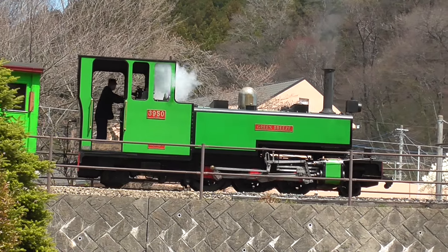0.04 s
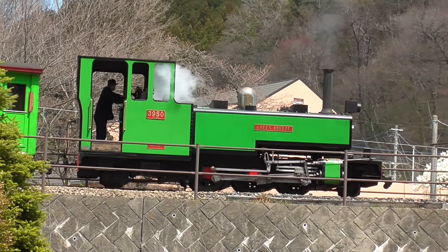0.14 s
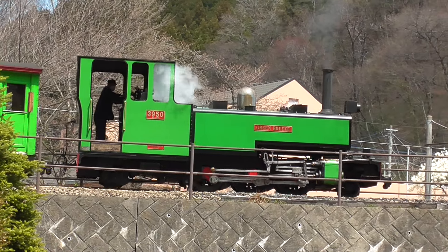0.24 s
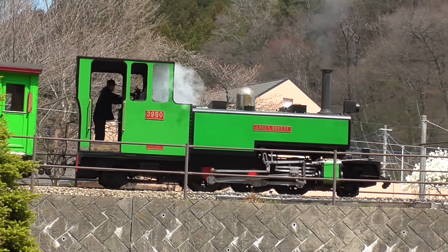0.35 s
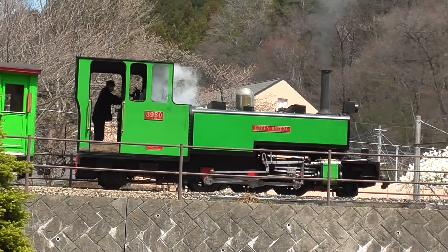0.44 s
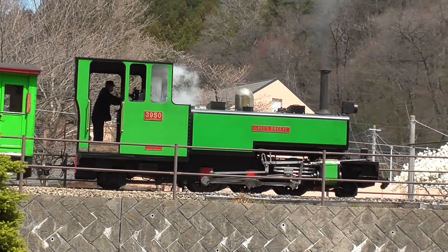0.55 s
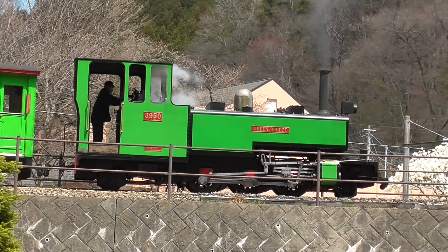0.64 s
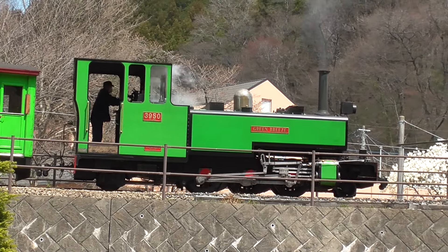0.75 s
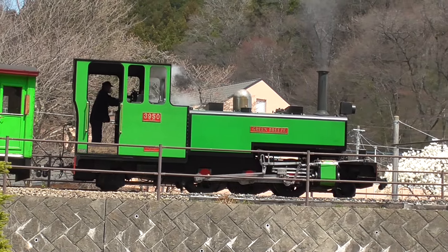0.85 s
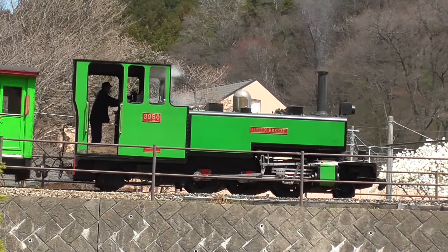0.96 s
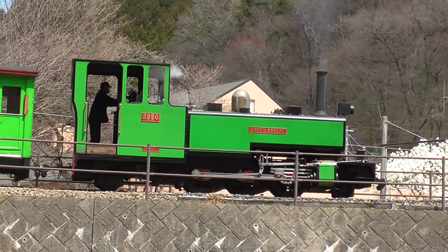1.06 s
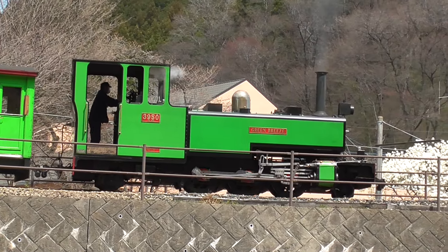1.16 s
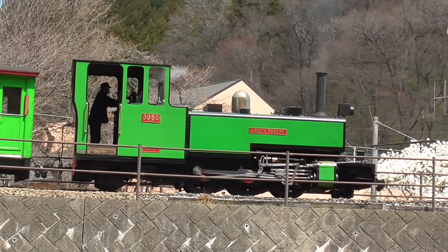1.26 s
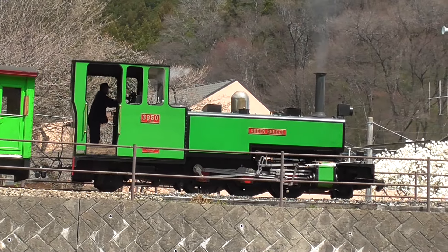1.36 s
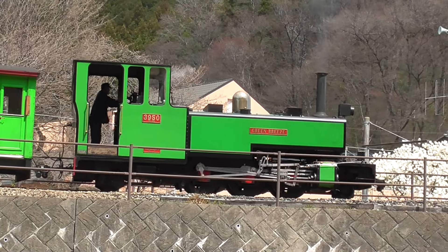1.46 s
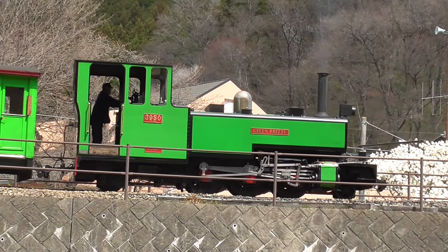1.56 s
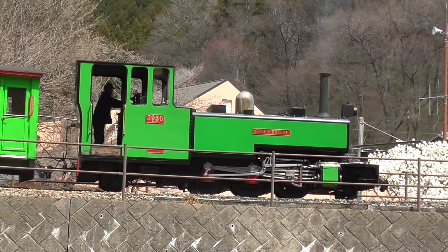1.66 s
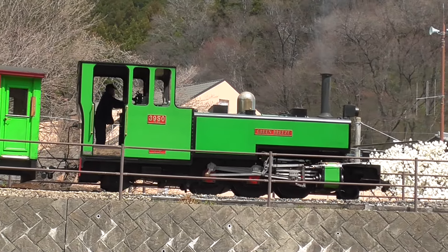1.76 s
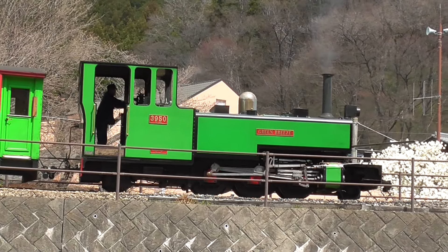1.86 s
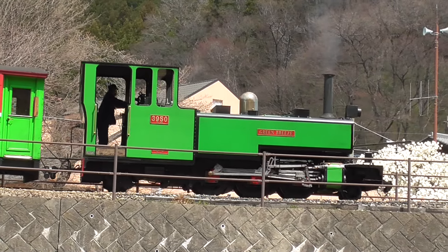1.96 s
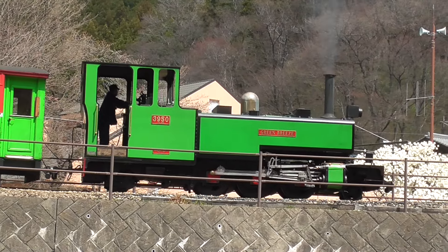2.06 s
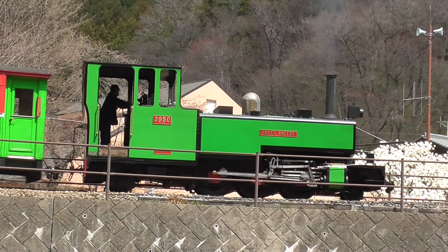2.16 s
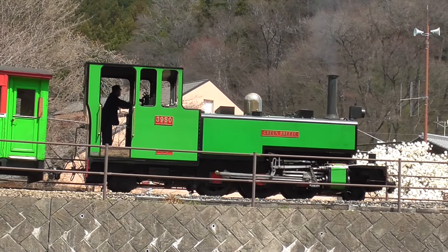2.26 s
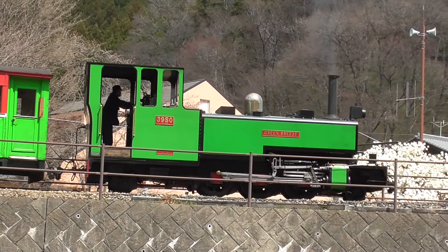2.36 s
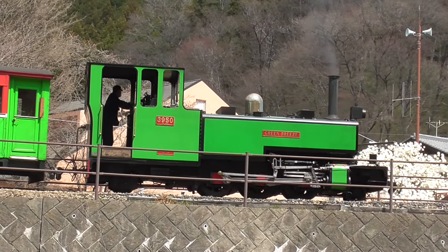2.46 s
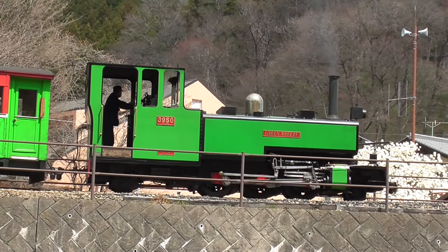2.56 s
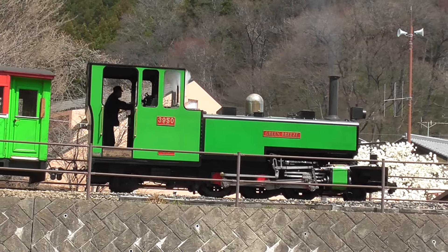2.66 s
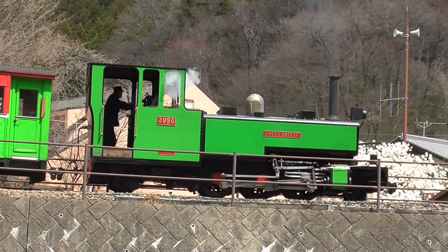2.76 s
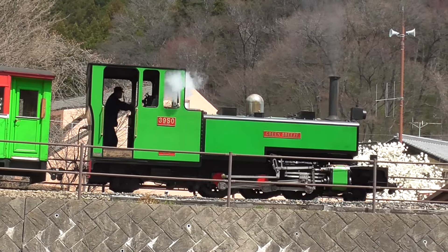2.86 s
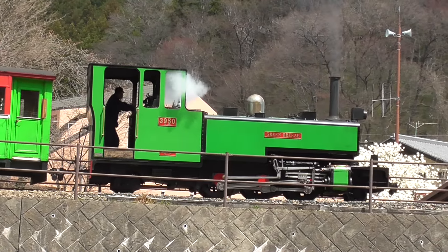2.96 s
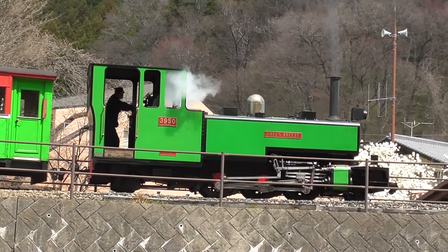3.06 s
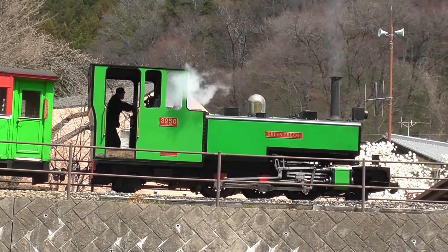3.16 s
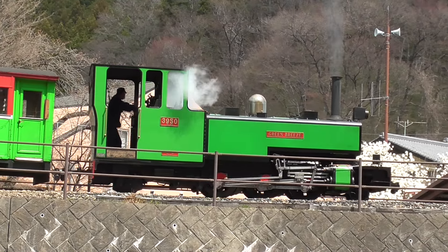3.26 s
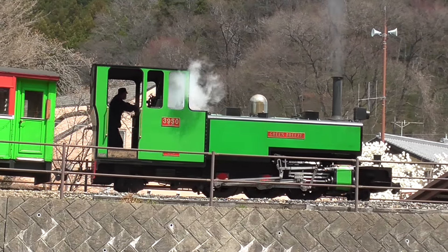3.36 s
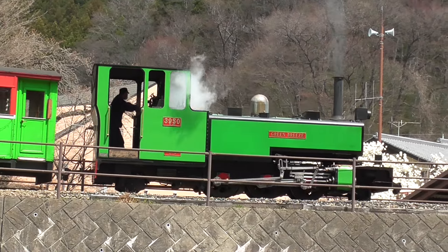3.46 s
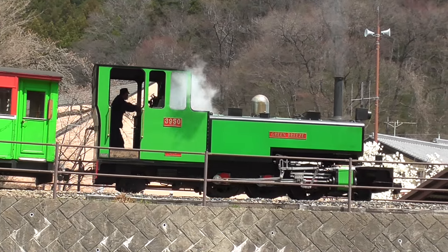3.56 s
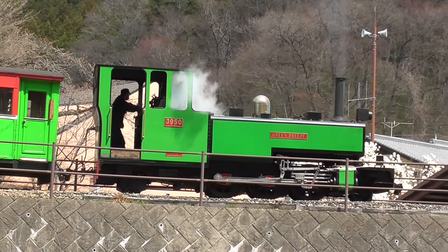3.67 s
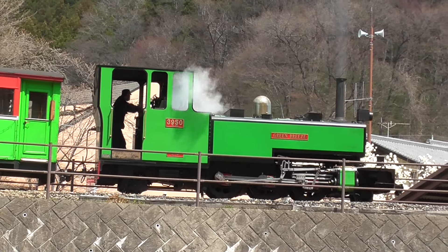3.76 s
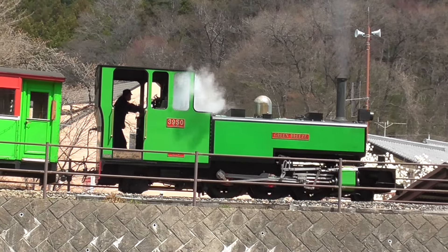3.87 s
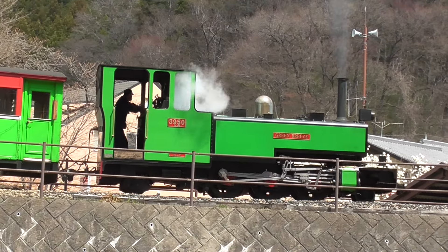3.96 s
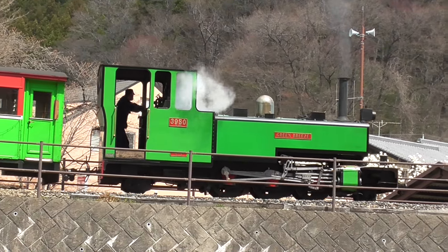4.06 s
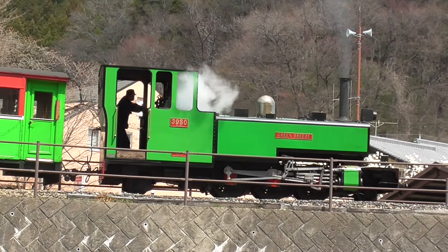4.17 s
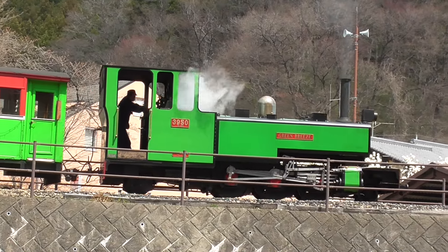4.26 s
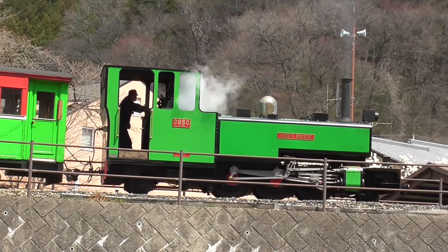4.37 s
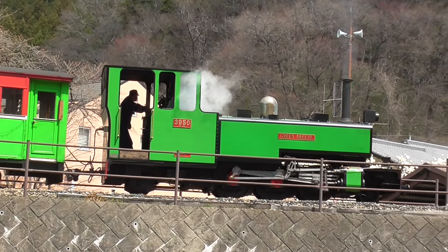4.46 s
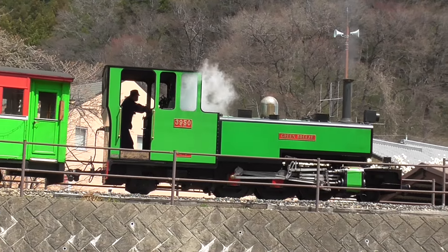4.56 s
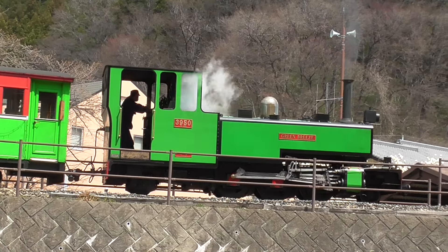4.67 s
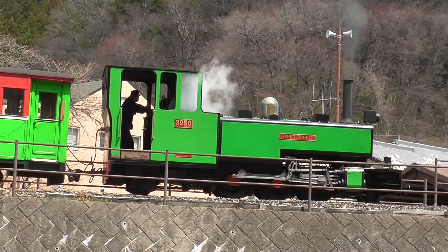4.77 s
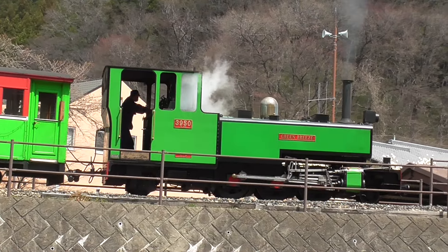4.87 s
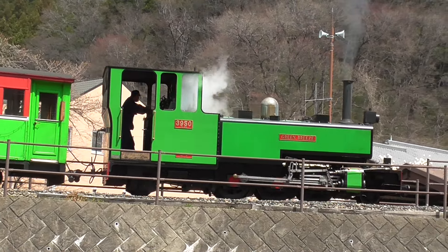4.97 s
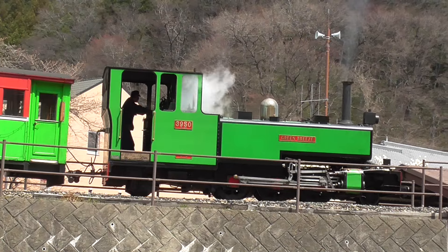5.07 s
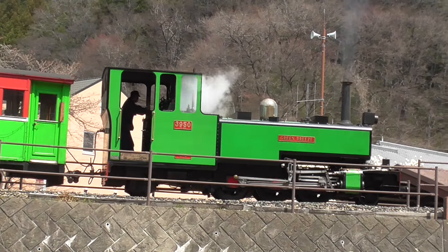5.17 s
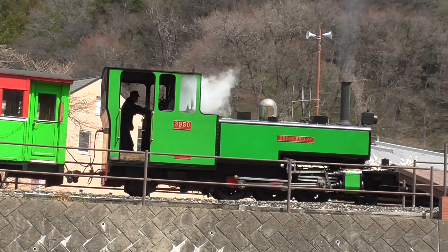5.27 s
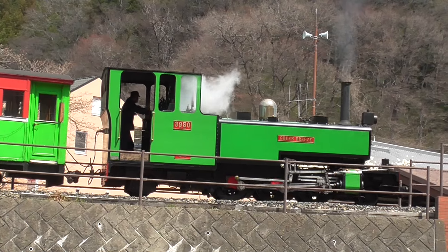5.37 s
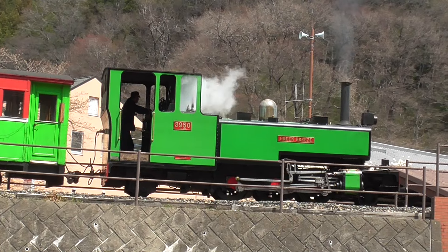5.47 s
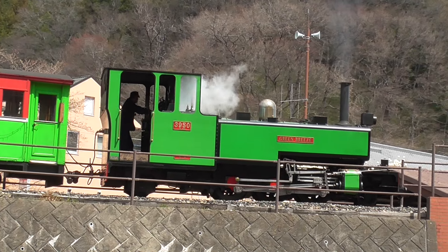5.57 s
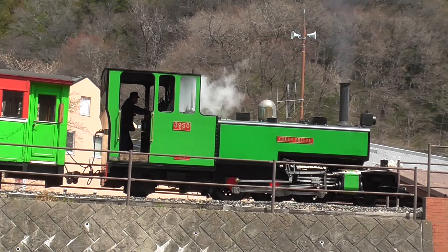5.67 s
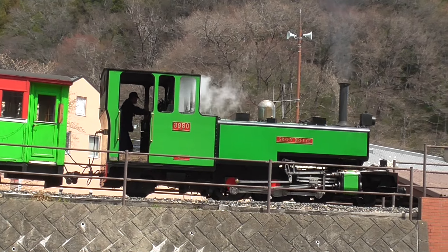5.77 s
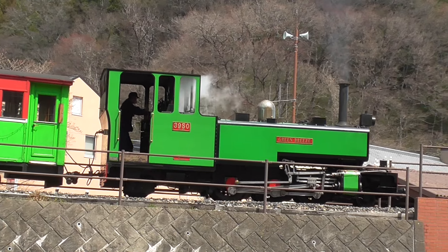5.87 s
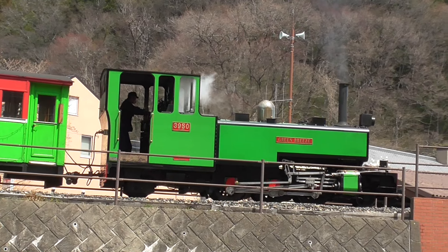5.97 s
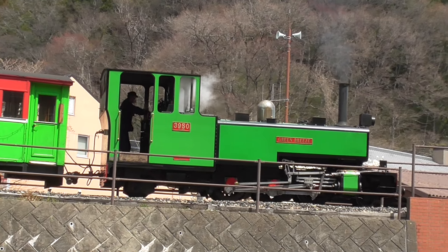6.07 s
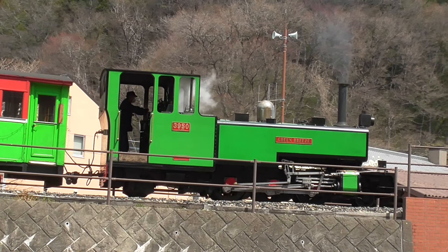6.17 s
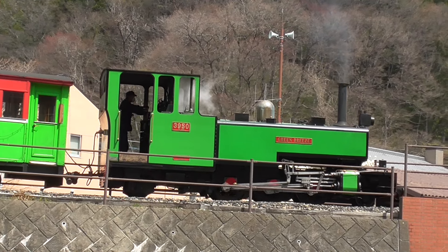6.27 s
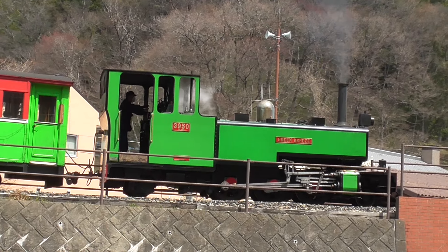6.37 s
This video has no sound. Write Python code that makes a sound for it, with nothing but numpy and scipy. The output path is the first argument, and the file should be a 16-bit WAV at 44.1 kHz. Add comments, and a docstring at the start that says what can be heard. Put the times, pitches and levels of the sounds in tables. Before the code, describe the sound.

A small steam locomotive sounds its single-note whistle outdoors. A short, wet, breathy toot comes first, already under way, and its echo fades off wooded hillsides. In the pause, quiet engine rumble, leaking steam and a few knocks emerge. A spurt of steam leads into a nearly three-second whistle blast, smooth and steady, which stops abruptly and leaves a blurred valley echo over the faint engine. The whistle dominates the stereo microphone, which ducks the background.

```python
"""A single-note whistle blows short, then long, its pitch climbing, and a wooded valley answers; a small engine rolls below.
The note is a near-pure tone that climbs as hot steam fills the bell; the steam jet is coloured noise that also stirs
the bell's other resonances. Hillsides return the note late and blurred, and trees scatter the roar.
An automatic gain ducks under the whistle; as it recovers between the blasts, one hears the engine's
filtered-noise rumble, leaking steam and knocks, and the brief wavering tones of its frames and wheels."""
import sys
import numpy as np
from scipy import signal
from scipy.fft import rfft, irfft, next_fast_len
from scipy.io import wavfile
from scipy.ndimage import uniform_filter1d

SR = 44100
rng = np.random.default_rng(int(sys.argv[2]) if len(sys.argv) > 2 else 0)


def log_audio(samples):
    """Write samples as a 16-bit WAV file to the path given in sys.argv[1]."""
    # one column per channel
    frames = np.atleast_2d(samples).T
    # limit to full scale, then quantise
    limited = np.clip(frames, -1, 1)
    pcm = np.round(limited * 32767).astype(np.int16)
    wavfile.write(sys.argv[1], SR, pcm)


N = 283322
T = np.arange(N) / SR

# The blasts. Each row: valve opens in seconds, closes in seconds, starting pitch in Hz,
# warm-up time constant in seconds, strength in dB.
BLASTS = [(-0.05, 0.348, 521.2, 0.47, 10), (2.755, 5.616, 539.8, 1.2, 14.5)]
# Wet steam chokes the note. Each row: centre in seconds, half width in seconds, share lost from 0 to 1.
CHOKES = [(0.107, 0.023, 0.6), (0.192, 0.024, 0.67), (2.88, 0.021, 0.85)]
# The voice of the short blast, before trims and the blast's strength.
# Each row: time in seconds, octave in dB, breathy roar in dB, hiss in dB.
VOICE_SHORT = [(0.01, -34, -30, -36), (0.046, -31.5, -32, -46.5), (0.096, -36.5, -29, -41.5),
               (0.164, -26.5, -27.5, -43), (0.21, -44, -27, -42), (0.23, -25, -25.5, -42.5),
               (0.25, -36, -32.5, -43.5), (0.33, -35.5, -37.5, -46)]
# The voice of the long blast, likewise.
# Each row: time in seconds, octave in dB, breathy roar in dB, hiss in dB.
VOICE_LONG = [(2.78, -35, -29.5, -41.5), (3.08, -31.5, -34.5, -48), (3.12, -36.5, -32, -44),
              (3.64, -27.5, -38, -44.5), (3.88, -36, -42.5, -52.5), (4.25, -36, -37, -51),
              (4.33, -39, -39.5, -54), (4.71, -28, -37.5, -46), (5.27, -34.5, -40, -52),
              (5.6, -32.5, -35.5, -44)]
# The long note sways between the ears. Each row: time in seconds, left over right in dB.
SWAY = [(2.8, 2), (3.1, 2.5), (3.86, 1), (4.51, 2.5), (5.06, 1.5), (5.6, 0.5)]
# Resonances of the bell stirred by the jet.
# Each row: multiple of the pitch, width in Hz before a lower limit, relative level in dB.
BELL_MODES = [(0.86, 34.3, -2), (0.998, 29.94, 3), (1.135, 30.3, 2), (1.31, 49.3, -3), (1.68, 54.9, -9),
              (1.84, 22.15, -4), (2.0, 36.26, -7.5), (2.168, 44.8, -8), (2.65, 110.3, -12.5),
              (2.98, 139.2, -18.5), (3.72, 126, -11), (4.45, 34.56, -19.5), (5.75, 69.5, -22.5),
              (6.63, 59.7, -22.5)]
# Colour of the steam jet. Each row: frequency in Hz, relative density in dB per Hz.
JET_COLOUR = [(30, -35.5), (90, -6.5), (200, 0.5), (320, -3.5), (450, 11), (750, 12), (1400, 2), (2300, -1),
              (2800, -6), (4200, -4.5), (6100, -12), (8500, -0.5), (10000, -3.5), (12500, -14),
              (15000, -21)]
# Left-right likeness of the jet. Each row: frequency in Hz, likeness from -1 to 1.
JET_LIKENESS = [(100, 0.5), (300, 0.57), (650, 0.95), (1200, 0.9), (2000, 0.57), (4000, 0.46), (8500, 0.53),
                (13000, 0.53)]
# Steam spurts as the valve cracks open.
# Each row: peak in seconds, rise in seconds, fall in seconds, level in dB.
SPURTS = [(2.559, 0.0097, 0.066, -41), (2.753, 0.027, 0.022, -22)]
# Near and far hillsides that return the note. Each row: delay in seconds, level in dB.
HILLS = [(0.153, -9), (0.337, -16), (0.471, -28.5), (0.722, -36), (0.95, -33.5), (1.35, -36.5),
         (1.918, -42)]
# Faces of the wooded slope that return the roar. Each row: delay in seconds, level in dB.
SLOPES = [(0.165, -8.5), (0.32, -11)]
# Colour of the engine's rumble. Each row: frequency in Hz, relative density in dB per Hz.
RUMBLE_COLOUR = [(15, -57.5), (25, -18.5), (156, -7.5), (189, -4.5), (229, -7), (486, -6.5), (525, 1.5),
                 (578, -10), (728, -10.5), (802, -7), (1110, -20), (1320, -17.5), (2500, -47),
                 (3250, -70.5), (5500, -120)]
# Colour of its leaking steam. Each row: frequency in Hz, relative density in dB per Hz.
LEAK_COLOUR = [(1180, -32.5), (2000, -2.5), (2270, -2), (2470, 0), (2660, -5), (3860, -2), (4340, -5.5),
               (6140, -12), (7450, -3), (8820, -1), (12700, -11), (15000, -21.5)]
# Steam leaks harder just before the long blast. Each row: time in seconds, level in dB.
LEAK_LEVEL = [(0.9, -57), (1.9, -57), (2.4, -53), (2.8, -55), (6.4, -54)]
# The frames and wheels sing briefly.
# Each row: centre in seconds, half width in seconds, frequency in Hz, level in dB.
GROANS = [(0.87, 0.035, 195, -32), (1.0, 0.09, 194, -40), (1.47, 0.08, 195, -42), (1.25, 0.06, 256, -44),
          (1.55, 0.2, 263, -41), (1.83, 0.05, 795, -42), (2.1, 0.06, 790, -43), (2.21, 0.09, 194, -41),
          (6.29, 0.015, 810, -33), (6.32, 0.08, 196, -38), (6.3, 0.16, 340, -43)]
# Knocks of the running gear. Each row: peak in seconds, level in dB, rise in seconds, 60 dB decay in seconds.
KNOCKS = [(0.945, -37, 0.003, 0.08), (1.591, -37, 0.002, 0.07), (1.648, -33, 0.002, 0.08),
          (2.3, -44, 0.02, 0.3), (2.352, -37, 0.015, 0.3), (6.04, -27, 0.003, 0.08),
          (6.053, -29, 0.006, 0.16)]
# Colour of the knocks. Each row: frequency in Hz, relative density in dB per Hz.
KNOCK_COLOUR = [(150, -10), (550, 3), (1000, 3), (1300, -2), (1800, -14), (2300, -14), (3500, -29),
                (6000, -35), (12000, -48)]
# Left-right likeness of the engine. Each row: frequency in Hz, likeness from -1 to 1.
ENGINE_LIKENESS = [(50, -0.65), (80, -0.57), (140, 0.25), (300, 0.51), (900, 0.62), (3000, 0.78),
                   (10000, 0.39)]

# pitch of the fully heated bell, its sag in a full choke, its wander in the steady blast
HOT_HZ, CHOKE_SAG_HZ, WANDER_HZ = 559.5, 11, 0.4
# level of the note before the blast's strength is added
NOTE_DB = -10.5
# thin sizzle at the valve seat, from the moment the lever takes up
SIZZLE_START_S, SIZZLE_FADE_DB_PER_S, SIZZLE_DB, SIZZLE_HZ = 2.55, 8, -43.5, 9300
RUMBLE_DB = -37.5
CUTOFF_HZ = 15300


def whistle_note(phase, unrest, octave_db, flutter_db=0.5, swell_db=0.45, octave_flutter_db=1.34,
                 octave_trim_db=1.0, third_db=-24.5, right_lead_rad=0.28):
    """The bell's standing wave: almost a sine, with a weak octave and a trace of the twelfth."""
    phase = phase + np.array([[0], [1]]) * right_lead_rad
    first_db = NOTE_DB + flutter_db * unrest * drift(31) + swell_db * drift(8.9)
    first = from_db(first_db) * clear_share() * np.sin(phase)
    second = from_db(octave_db + octave_trim_db + octave_flutter_db * drift(35)) * np.sin(2 * phase)
    third = from_db(octave_db + third_db + 2 * drift(12)) * np.sin(3 * phase)
    # a rough jet weakens the twelfth
    third = third / np.maximum(unrest, 0.5) ** 2
    return np.sqrt(2) * (first + second + third) * valve(edge_s=0.004)


def standing_wave(pitch, unrest, jitter=0.0022):
    """Phase of the note, in radians, shaken more when the jet is rough."""
    shaken_hz = pitch * (1 + jitter * unrest * drift(40))
    return 2 * np.pi * np.cumsum(shaken_hz) / SR


def bell_pitch(unrest):
    """The note climbs towards its hot pitch in every blast, sags when choked and wanders with the jet."""
    climbs = []
    for opens, _, start_hz, warm_s, _ in BLASTS:
        coldness = np.exp(-np.maximum(T - opens, 0) / warm_s)
        climbs.append(HOT_HZ + (start_hz - HOT_HZ) * coldness)
    sag = CHOKE_SAG_HZ * (1 - clear_share())
    return per_blast(*climbs) - sag + WANDER_HZ * unrest * drift(3.81)


def clear_share():
    """Share of the note that survives the slugs of wet steam."""
    return np.prod([1 - min(lost, 1) * np.exp(-((T - s) / width) ** 2) for s, width, lost in CHOKES], axis=0)


def valve(edge_s):
    """1 while steam flows, 0 otherwise, with soft edges."""
    flow = 0
    for opens, closes, *_ in BLASTS:
        flow = flow + 0.5 * (np.tanh((T - opens) / edge_s) - np.tanh((T - closes) / edge_s))
    return flow


def per_blast(short, long):
    """The first blast's controls until midway through the pause, then the second's."""
    midway = (BLASTS[0][1] + BLASTS[1][0]) / 2
    return np.where(T < midway, short, long)


def strength():
    """Gain of the blast whose controls are in force."""
    return from_db(per_blast(*(db for *_, db in BLASTS)))


def bell_roar(pitch, roar_db, unrest, level_db=-2.5, side_db=-17, dulling=0.65):
    """Turbulence rings in resonances that climb with the note; a rough jet stirs mostly the low ones."""
    phase = 2 * np.pi * np.cumsum(pitch) / SR
    upper_gain = unrest ** -dulling
    modes = []
    for multiple, width_hz, db in BELL_MODES:
        gain = from_db(db)
        if multiple > 2.4:
            gain = gain * upper_gain
        # high resonances radiate freely, so none is sharp
        modes.append((multiple, max(width_hz, 15 * multiple), gain))
    mid, side = (sum(gain * narrow_noise(multiple * phase, width_hz) for multiple, width_hz, gain in modes)
                 for _ in range(2))
    ring = mid + from_db(side_db) * side * [[1], [-1]]
    return from_db(roar_db + level_db) * valve(edge_s=0.005) * ring


def steam_jet(pitch, hiss_db, level_db=7.0, flicker_db=0.6):
    """Broad hiss from the slot, as the full flow and as brief spurts, with a thin sizzle at the valve seat."""
    flow = strength() * from_db(hiss_db + level_db) * valve(edge_s=0.014)
    spurts = sum(from_db(db) * np.exp(-np.maximum((s - T) / rise, (T - s) / fall))
                 for s, rise, fall, db in SPURTS)
    noise = stereo_noise(JET_COLOUR, JET_LIKENESS)
    # part of the hiss runs up the bell and comes back one period later
    noise = noise + 0.17 * np.array([delayed(channel, 1 / pitch) for channel in noise])
    hiss = np.hypot(flow, spurts) * from_db(flicker_db * drift(26)) * noise
    seat_db = SIZZLE_DB - SIZZLE_FADE_DB_PER_S * (T - SIZZLE_START_S)
    seat_gain = from_db(seat_db) * (T > SIZZLE_START_S)
    sizzle = seat_gain * np.array([narrow_noise(2 * np.pi * SIZZLE_HZ * T, 480) for _ in range(2)])
    return hiss * pan(0.81) + sizzle


def splutter(roar_db, unrest, level_db=-23, cough_db=-31, cough_s=0.029):
    """A wet, rough jet also rumbles, and coughs as the valve opens."""
    flow = strength() * from_db(roar_db + level_db) * unrest * valve(edge_s=0.0089)
    cough = from_db(cough_db) * sum(np.exp(-((T - opens) / cough_s) ** 2) for opens, *_ in BLASTS)
    return (flow + cough) * stereo_noise(RUMBLE_COLOUR, ENGINE_LIKENESS)


def hillside(pitch, note_phase, wander_rad=0.3, blur_db=-19, octave_db=-20, fade_db=-25, flutter_db=3.0):
    """Hillsides return the note late, heard while the valve is shut; many paths shake it more as it fades."""
    sent_power = (strength() * from_db(NOTE_DB) * clear_share() * valve(edge_s=0.022)) ** 2
    powers = [from_db(db) ** 2 * delayed(sent_power, s) + 1e-12 for s, db in HILLS]
    level = np.sqrt(sum(powers))
    # one tone stands for all hills: their pitches averaged by power
    heard_hz = np.average([np.interp(T - s, T, pitch) for s, _ in HILLS], axis=0, weights=powers)
    phase = 2 * np.pi * np.cumsum(heard_hz) / SR
    # the echo carries on in step with the note as the valve shuts
    shuts = [closes for _, closes, *_ in BLASTS]
    step = np.interp(shuts, T, note_phase - phase) % (2 * np.pi)
    phase = phase + np.interp(T, shuts, step)
    faded = 1 / (1 + level / from_db(fade_db))
    ear_phases = phase + 2 * wander_rad * faded * np.array([drift(15), drift(11)])
    blur = from_db(blur_db) * narrow_noise(phase, 24) + from_db(octave_db) * narrow_noise(2 * phase, 20)
    flutter = from_db(flutter_db * faded * drift(13))
    valve_shut = 1 - valve(edge_s=0.0043)
    return level * flutter * valve_shut * (np.sqrt(2) * np.sin(ear_phases) + blur)


def trees(steam, far_db=-17, near_db=-15, quick_db=-11):
    """Roar scatters off the engine's side and near walls, short and bright, then off the woods, late and dull."""
    woods = from_db(far_db) * scatter(steam, t60=4.4, dull_hz=1900)
    quick = scatter(steam, t60=0.4, dull_hz=7000)
    slope = sum(from_db(db) * np.array([delayed(ear, s) for ear in quick]) for s, db in SLOPES)
    # foliage and distance take the treble from the slope's answer
    foliage = signal.butter(4, 1500, fs=SR, output="sos")
    far = signal.sosfilt(foliage, woods + slope)
    walls = scatter(steam, t60=0.8, dull_hz=10000)
    return far + from_db(near_db) * walls + from_db(quick_db) * quick


def scatter(x, t60, dull_hz, spread=0.85):
    """Countless reflections that die away by 60 dB in t60 seconds, partly different for each ear."""
    t = T[:2 * SR]
    # nothing returns in the first 12 ms
    mid, side = rng.standard_normal((2, len(t))) * from_db(-60 * t / t60) * (t > 0.012)
    paths = mid + spread * side * [[1], [-1]]
    paths /= np.sqrt(np.sum(paths ** 2, axis=1, keepdims=True))
    dulling = signal.butter(1, min(dull_hz, 0.45 * SR), fs=SR, output="sos")
    return signal.fftconvolve(x, signal.sosfilt(dulling, paths), axes=1)[:, :N]


def engine(lumpy_db=0.5):
    """Rolling rumble and leaking steam are wavering noise; groans are brief tones, knocks short noise bursts."""
    rumble = from_db(RUMBLE_DB + lumpy_db * drift(9.6)) * stereo_noise(RUMBLE_COLOUR, ENGINE_LIKENESS)
    leak_db = in_time(LEAK_LEVEL)[0] + 1.2 * drift(9.2)
    leak = from_db(leak_db) * stereo_noise(LEAK_COLOUR, ENGINE_LIKENESS)
    groans = 0
    for s, width, hz, db in GROANS:
        swell = from_db(db) * np.exp(-((T - s) / width) ** 2)
        groans = groans + swell * np.sqrt(2) * np.sin(2 * np.pi * hz * T + 0.5 * drift(15))
    blows = 0
    for s, db, rise, t60 in KNOCKS:
        decay = from_db(db - 60 * np.clip((T - s) / t60, 0, 2))
        blows = blows + decay * np.clip((T - s) / rise + 1, 0, 1)
    knocks = blows * stereo_noise(KNOCK_COLOUR, ENGINE_LIKENESS)
    return (rumble + leak + groans + knocks) * pan(1.6)


def gain_control(x, ceiling_db=-10.0, attack_s=0.01, hold_s=0.25, release_db_per_s=19):
    """Automatic gain looks slightly ahead, turns down what exceeds its ceiling, waits, then creeps back up."""
    power = uniform_filter1d(np.mean(x ** 2, axis=0), size=600)
    excess_db = np.maximum(10 * np.log10(np.abs(power) + 1e-12) - ceiling_db, 0)
    # look 6 ms ahead
    excess_db = delayed(excess_db, -0.006)
    release = release_db_per_s * T
    cut_db = np.maximum.accumulate(excess_db + release) - release
    cut_db = np.maximum(cut_db, delayed(cut_db, hold_s))
    r = np.exp(-1 / (attack_s * SR))
    smooth_cut_db = signal.lfilter([1 - r], [1, -r], cut_db, zi=[r * cut_db[0]])[0]
    return x * from_db(-smooth_cut_db)


def narrow_noise(phase, width_hz):
    """A resonance stirred by turbulence: a carrier whose strength and phase wander; rms 1."""
    return drift(width_hz * 0.59) * np.cos(phase) + drift(width_hz * 0.91) * np.sin(phase)


def stereo_noise(spectrum, likeness):
    """Noise with a colour and a left-right likeness; the part common to both ears has rms 1."""
    size = next_fast_len(N)
    hz = np.fft.rfftfreq(size, 1 / SR)
    mid, side = rfft(rng.standard_normal((2, size))) * from_db(at_hz(spectrum, hz))
    alike = np.clip(at_hz(likeness, hz), -0.85, 1)
    side = side * np.sqrt((1 - alike) / (1 + alike))
    mid, side = irfft([mid, side], size)[:, :N]
    return (mid + side * [[1], [-1]]) / np.std(mid)


def drift(rate_hz):
    """Smooth chance of spread 1, wandering at about the given rate."""
    # drawn at a tenth of the sample rate; the filter's first 2000 steps are let go
    r = np.exp(-2 * np.pi * rate_hz * 10 / SR)
    slow = signal.lfilter([1], [1, -2 * r, r * r], rng.standard_normal(N // 10 + 2002))[2000:]
    return np.interp(np.arange(N) / 10, np.arange(len(slow)), rms_one(slow))


def delayed(x, s):
    """The sound s seconds later."""
    return np.interp(T - s, T, x, left=0)


def pan(db):
    """Left and right gains for a level difference, left over right."""
    return from_db(np.array([[0.5], [-0.5]]) * db)


def at_hz(points, hz):
    """Read a spectrum on a log-frequency axis."""
    point_hz, values = np.array(points).T
    return np.interp(np.log(hz + 1), np.log(point_hz), values)


def in_time(rows):
    """Each column of a curve at every sample."""
    s, *columns = np.transpose(rows)
    return [np.interp(T, s, column) for column in columns]


def rms_one(x):
    """Scale to unit power."""
    return x / np.sqrt(np.mean(np.abs(x) ** 2) + 1e-20)


def from_db(db):
    """Decibels to gain."""
    return 10 ** (np.asarray(db) / 20)


def scene():
    """Whistle and steam, their echoes, and the engine."""
    octave_db, roar_db, hiss_db = per_blast(in_time(VOICE_SHORT), in_time(VOICE_LONG))
    sway_db = per_blast(1.2, in_time(SWAY)[0])
    # roughness of the jet: 1 in the steady blast
    steady_db = np.median(roar_db[T > BLASTS[1][0]])
    unrest = np.sqrt(from_db(roar_db - steady_db))
    pitch = bell_pitch(unrest)
    phase = standing_wave(pitch, unrest)
    note = strength() * whistle_note(phase, unrest, octave_db) * pan(sway_db)
    roar = strength() * bell_roar(pitch, roar_db, unrest) * pan(0.57)
    steam = roar + steam_jet(pitch, hiss_db)
    echo = hillside(pitch, phase) * pan(1.6)
    return note + steam + splutter(roar_db, unrest) + echo + trees(steam) + engine()


def record(dry):
    """The microphone sheds the deepest bass, the gain ducks under the whistle and the top is cut steeply."""
    bass_cut = signal.butter(2, 38, "high", fs=SR, output="sos")
    top_cut = signal.ellip(10, 0.1, 90, CUTOFF_HZ, fs=SR, output="sos")
    lean = signal.sosfilt(bass_cut, dry)
    return signal.sosfilt(top_cut, gain_control(lean))


dry = scene()
out = record(dry)
log_audio(out)
```